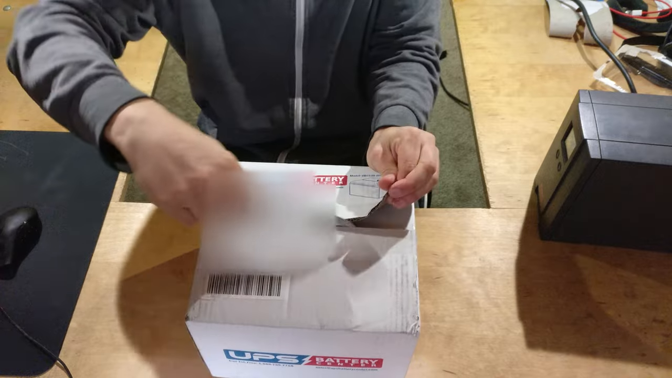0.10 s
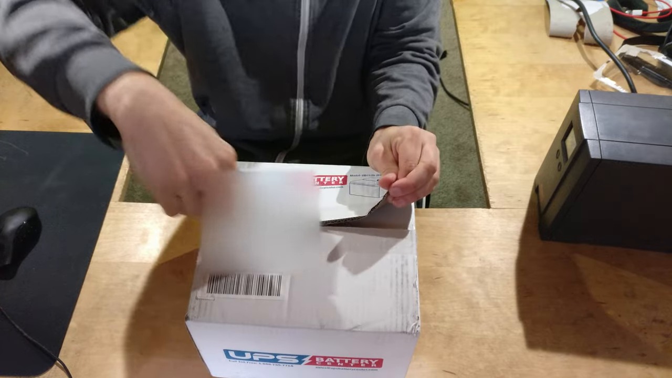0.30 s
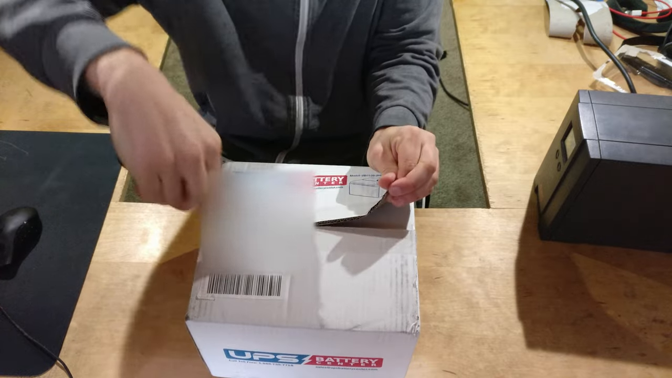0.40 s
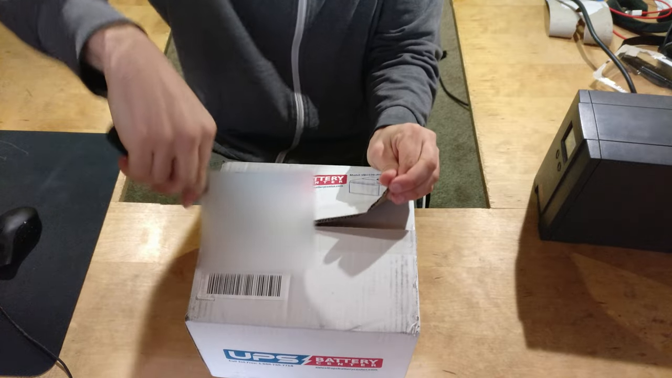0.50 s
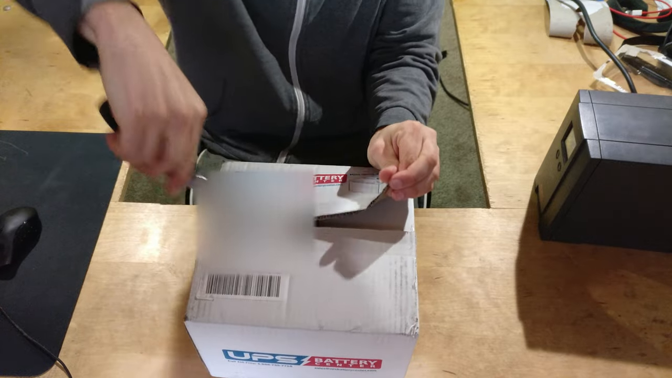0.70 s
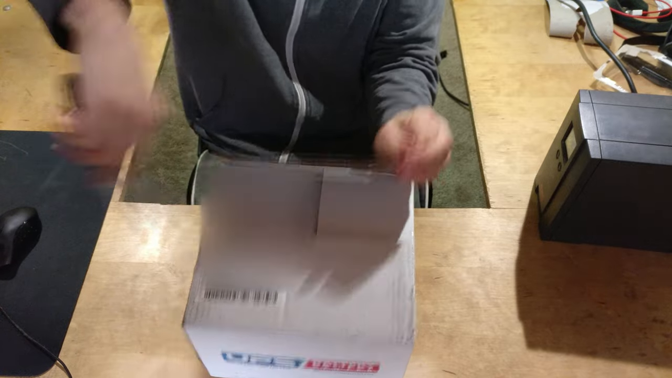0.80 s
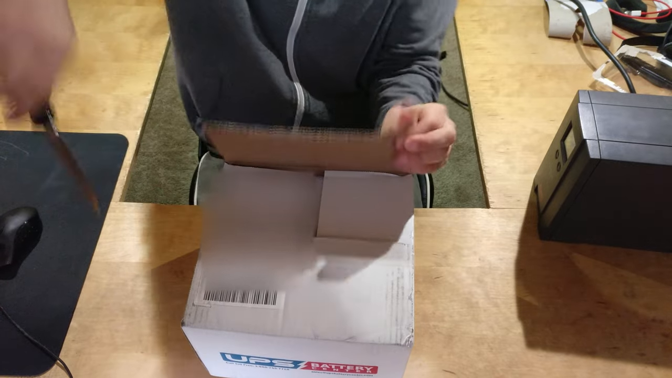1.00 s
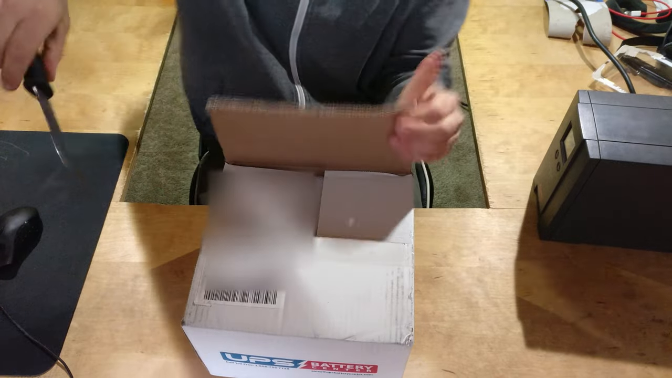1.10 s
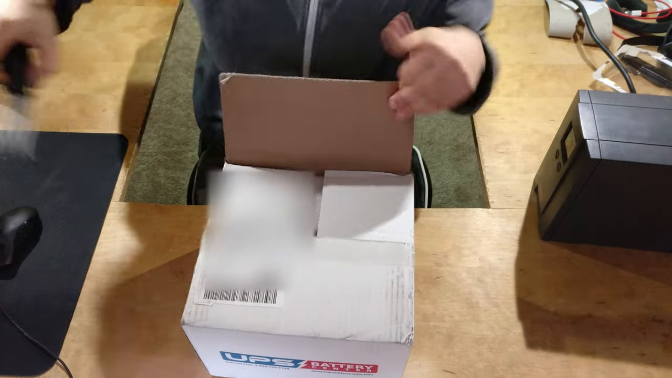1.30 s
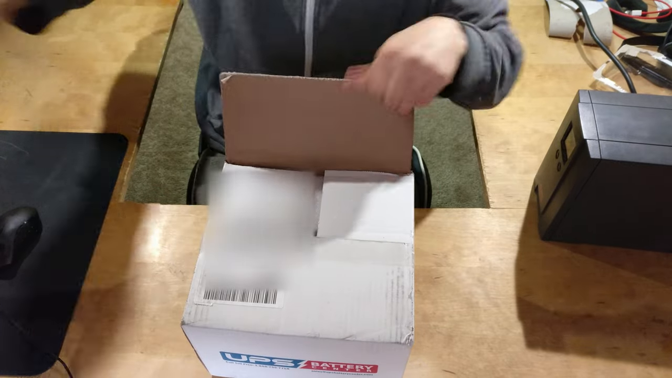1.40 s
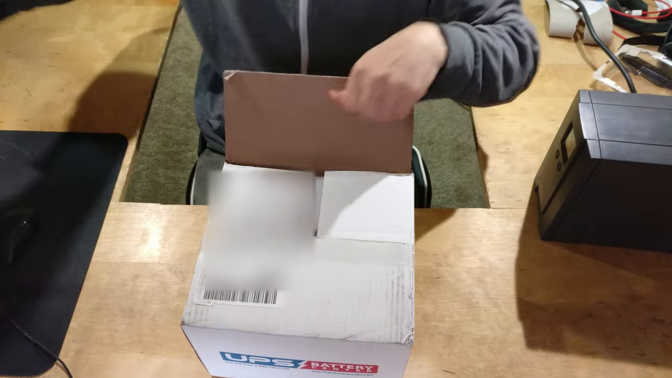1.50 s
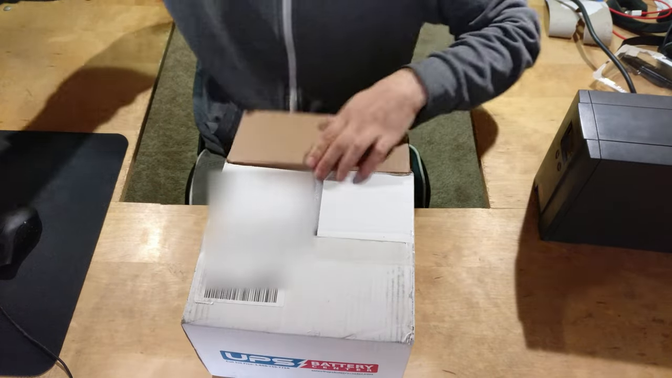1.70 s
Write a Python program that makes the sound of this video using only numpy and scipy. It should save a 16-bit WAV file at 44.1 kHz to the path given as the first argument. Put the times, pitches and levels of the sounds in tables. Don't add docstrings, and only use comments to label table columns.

```python
import sys
import numpy as np
from scipy import signal
from scipy.fft import rfft, irfft, next_fast_len
from scipy.io import wavfile
from scipy.ndimage import uniform_filter1d

SR = 44100
rng = np.random.default_rng(int(sys.argv[2]) if len(sys.argv) > 2 else 0)


def gain_from_decibels(decibels):
    exponent = np.asarray(decibels, float) / 20
    return 10 ** exponent


def dump_mix(stems):
    frames = np.atleast_2d(stems).T
    limited = np.clip(frames, -1, 1)
    pcm = np.round(limited * 32767).astype(np.int16)
    wavfile.write(sys.argv[1], SR, pcm)


N = 79380


def colour(x, points, share=1):
    size = next_fast_len(N + 4096)
    hz = np.arange(size // 2 + 1) * SR / size
    point_hz, point_db = np.array(points, float).T
    response_db = np.interp(np.log(hz + 1), np.log(point_hz), point_db)
    return irfft(rfft(x, size) * gain_from_decibels(share * response_db), size)[..., :N]


def filtered(x, order, hz, kind):
    return signal.lfilter(*signal.butter(order, hz, kind, fs=SR), x)


def unit(x):
    return x / np.sqrt(np.mean(x ** 2))


def walk(rate_hz):
    hold = int(SR / rate_hz)
    steps = rng.standard_normal(N + 1)[:N // hold + 1]
    return unit(uniform_filter1d(np.repeat(steps, hold), hold)[:N])


def ring(x, hz, t60):
    pole = np.exp(-np.log(1000) / (t60 * SR))
    turn = 2 * np.pi * hz / SR
    gain = np.sqrt(1 - pole * pole) * np.sin(turn)
    return signal.lfilter([gain], [1, -2 * pole * np.cos(turn), pole * pole], x)


def clicks(rate, spread_db):
    happens, sign, size = rng.random((3, N))
    return unit((happens < rate / SR) * np.sign(sign - .5) * gain_from_decibels(-spread_db * np.log(1 - size)))


def ports(three):
    alike = 0.25
    return np.sqrt(alike) * three[0] + np.sqrt(1 - alike) * three[1:]


# length in seconds, click level in dB,
# change over the stroke in dB, push into the box in dB
STROKES = [(0.015, -70.5, -6, -57.5), (.05, -82, -15, -88), (0.034, -52, -16, -29.5), (0.11, -71, 7, -56.5),
           (0.05, -55, 0, -44.5), (0.02, -57.5, 2.5, -47), (0.04, -50, -3, -32.5), (0.027, -44.5, 1, -32),
           (0.014, -32, -6, -28.5), (0.04, -39, 2.5, -33), (0.045, -48.5, 2.5, -40.5),
           (0.0063, -46, -3.5, -36), (0.033, -58.5, 2.5, -44.5), (.02, -34.5, -6.5, -29),
           (0.12, -29, -11, -21.5), (0.027, -28.5, 4, -18), (0.052, -34, -14, -17.5), (0.031, -66, 2, -64),
           (0.028, -50, -10, -39), (0.05, -66, -6, -69.5), (0.228, -70.5, 3.5, -62.5),
           (0.048, -61.5, -2, -81.5), (0.095, -60.5, 10, -48.5), (0.038, -41, -0.5, -56),
           (0.13, -53, -7, -52), (0.0424, -45, -11.5, -38), (0.074, -86, -9, -76)]
STARTS_S = [.052, .16, .2575, .31, .384, .441, .464, .518, .548, .572, .655, .687, .745, .7715, .792, .856,
            .89]
LATE_STARTS_S = [
    1.07,
    1.096,
    1.23,
    1.29,
    1.34,
    1.521,
    1.614,
    1.655,
    1.727,
    1.77,
]


def effort(column):
    t, power = np.arange(N) / SR, 0
    for start, row in zip(STARTS_S + LATE_STARTS_S, STROKES):
        length_s, click_db, change_db = row[:3]
        age = t - start
        attack_s = 0.0018 + .0005 * max(-50 - click_db, 0)
        db = row[column] + change_db * np.clip(age / length_s, 0, 1)
        db = db - 894.5 * np.maximum(age - length_s, 0)
        power = power + (gain_from_decibels(db) * np.clip(age / attack_s, 0, 1)) ** 2
    return np.sqrt(power)


# frequency in Hz, level in dB per Hz
FIBRES = [(470, -42), (800, -16), (1170, -15.5), (1520, -11), (2730, -12), (5940, -16.5), (7260, -22),
          (9450, -23), (16000, -34)]


def tear():
    raw = np.array([clicks(5000, 2) for _ in range(3)])
    scraps = 0
    for hz in np.geomspace(1100, 14500, num=28):
        scraps = scraps + ring(raw * gain_from_decibels(6 * walk(70)), hz, .014) * np.sqrt(hz)
    fibres = unit(colour(raw + gain_from_decibels(-5) * unit(scraps), FIBRES))
    sheen = filtered(fibres[::-1], 2, 10500, "high")
    level = effort(column=1)
    bright = gain_from_decibels(-11) * ports(sheen) * level ** 0.73
    return (ports(fibres) * level + bright) * gain_from_decibels(0.86 * walk(300))


# frequency in Hz, level in dB, time to die by 60 dB in seconds
BOX = [(50, -28.5, 0.094), (80, -25, 0.3), (108, 1, 0.27), (186, -5.5, 0.1), (246, -4, 0.13),
       (311, -7.5, 0.069), (384.6, -12, 0.071), (501, -6.5, 0.035), (567, -8.5, 0.074), (649.2, -2, 0.059),
       (760, -14.5, .1), (1000, -14, .07), (1446, -8, 0.031), (1926, -1.5, 0.017)]


def shake(jolts):
    total = 0
    for hz, db, t60 in BOX:
        total = total + gain_from_decibels(db) * (108 / hz) ** 0.11 * ring(jolts, hz, 0.3 * t60)
    return total


def rub():
    jolts = np.array([clicks(1500, 2.6) for _ in range(2)])
    shaken = shake(jolts * effort(column=3)) / np.std(shake(jolts))
    mid, side = filtered(shaken, 1, 1040, "low")
    side = gain_from_decibels(-8.5) * filtered(side, 2, 450, "high")
    return np.array([mid + side, mid - side])


def fade(age, t60):
    return gain_from_decibels(-60 * (age / t60) ** 1.5)


def struck(age, free_hz, free_t60, chance):
    hz, db, t60 = np.array(BOX, float).T[:, :, None]
    level_chance, pitch_chance, sign_chance = chance
    octaves_away = np.abs(np.log2(hz / free_hz))
    gain = np.sign(sign_chance) * gain_from_decibels(-10 + db + 4.5 * level_chance - 6 * octaves_away / 1.6)
    waves = np.sin(2 * np.pi * hz * (1 + 0.033 * pitch_chance) * age)
    others = np.sum(gain * waves * fade(age, np.minimum(t60, 2.2 * free_t60)), axis=0)
    panel = -np.sin(2 * np.pi * free_hz * age) * fade(age, min(free_t60, 42 / free_hz))
    contact_turns = 0.24
    push = np.sin(np.pi * np.clip(np.arange(800) / SR * free_hz / contact_turns, 0, 1))
    return signal.fftconvolve(others + panel, push / push.sum())[:len(age)]


# start in
# seconds, peak in dB, pitch of the free panel in Hz, its time to die by 60 dB in seconds, crack in dB relative
KNOCKS = [(.055, -46.5, 186, 0.085, -48), (0.2122, -12.5, 207, 0.049, -26.5),
          (0.259, -26.5, 289, 0.027, -18), (0.272, -15.5, 113.4, 0.12, -43), (.406, -32.5, 109, 0.17, -49),
          (0.464, -29, 261, 0.08, -5.5), (.479, -23.5, 173, 0.049, -48), (0.4914, -15, 186.4, 0.05, -36),
          (0.521, -18, 232, 0.039, -49), (0.548, -22.5, 223, 0.071, 9), (0.582, -21, 108, 0.14, -53),
          (.602, -21, 106, 0.12, -45), (0.708, -31, 97, 0.2, -46), (0.7718, -29, 226, 0.1, 6),
          (.793, -21.5, 633, 0.15, 9.5), (0.798, -29.5, 223.7, 0.24, -10), (0.8659, -16, 183.6, .12, 13),
          (.872, -17.5, 50, 0.29, -51.5), (0.883, -24, 108, 0.12, -29), (1.096, -39.5, 90.1, 0.09, 4),
          (1.534, -29, 95.7, 0.071, -40), (1.564, -25.5, 317, 0.045, 2.5), (1.7477, -21, 171, 0.015, -40),
          (1.7631, -28.5, 108, 0.033, -38),
          (.2125, -27, 630, 0.039, -40), (.2595, -28.5, 632.4, .06, -16), (.867, -20, 1040, 0.033, -30),
        (.87, -18, 660, 0.076, -29.5), (0.66, -38, 1520, 0.043, -30), (.903, -17, 106, 0.2, -41),
        (1.736, -27, 120, 0.028, -22), (1.266, -51, 95, 0.096, -27.5), (1.098, -47, 820, 0.049, -8),
        (1.782, -33.5, 100, .09, -40), (.975, -27, 105, 0.11, -39.5), (1.1, -36.5, 48, 0.056, -40),
        (.59, -30, 1520, 0.02, -20), (.812, -24.5, 620, 0.047, -19.5), (1.9, -52, 520, .05, -32),
        (1.616, -47, 1400, .04, -21), (.06, -54, 85, .1, -40), (.44, -30.5, 200, .05, -3),
        (0.32, -30.5, 215, .04, -30), (.7995, -22.5, 280, 0.014, 0.5), (.861, -26, 600, 0.023, 4),
        (.8755, -22, 1950, .02, 4.5), (.881, -27.5, 610, .02, 2.5), (.898, -23, 310, 0.016, 0.5),
        (.532, -24, 100, .1, -30), (1.17, -45.5, 70, .08, -40), (1.5, -48.5, 76, .06, -41),
        (0.62, -54, 75, .07, -26.5), (.945, -32.5, 200, 0.066, -26.5), (0.55, -50.5, 100, .05, -40),
        (0.59, -34.5, 700, .02, -4), (.6582, -36, 360, 0.047, 2), (0.43, -36, 250, 0.065, -1.5),
        (.575, -26.5, 280, .04, -4), (1.585, -33, 90, .07, -30), (.69, -33, 260, .08, -30)]
# frequency in Hz, level in dB per Hz
CRACK = [(470, -31.5), (800, 6), (1500, -15), (1950, -1), (3830, -9), (8550, -18.5), (16000, -34.5)]


def knocks():
    body, crack, thud = np.zeros((3, N + SR))
    events = KNOCKS
    chances = rng.standard_normal((len(events), 3, len(BOX), 1))
    grit = ports(unit(colour(rng.standard_normal((3, N)), CRACK)))
    age = np.arange(SR // 2) / SR
    for (start, peak_db, free_hz, free_t60, crack_db), chance in zip(events, chances):
        at = int(start * SR)
        late = np.maximum(age - (start * SR - at) / SR, 0)
        span = slice(at, at + len(age))
        body[span] += struck(late, free_hz, free_t60, chance) * gain_from_decibels(peak_db)
        crack[span] += gain_from_decibels(peak_db + crack_db - 8.5) * np.exp(-late / .0022)
        thud_db = peak_db - 30.5 + 0.64 * (crack_db + 25.5)
        thud[span] += gain_from_decibels(thud_db) * np.exp(-late / 0.0068)
    dull = unit(ring(rng.standard_normal((2, N)), 1720, 0.003))
    flutter = gain_from_decibels(0.71 * walk(39.38))
    return body[:N] * flutter + crack[:N] * grit + thud[:N] * dull


def room(dry):
    age = np.arange(SR // 2) / SR
    t60_s, level_db = 0.27, -13
    tail = rng.standard_normal((2, len(age))) * gain_from_decibels(-60 * age / t60_s) * (age > .004)
    tail = gain_from_decibels(level_db) * unit(tail) / np.sqrt(len(age))
    sent = filtered(dry.mean(axis=0), 2, [164, 7000], "band")
    return signal.fftconvolve(sent[None], tail, axes=1)[:, :N]


def hiss():
    return filtered(rng.standard_normal((2, N)), 2, 7500, "high") * gain_from_decibels(-78.5 + 1.6 * walk(13))


# frequency in Hz, level in dB per Hz
FLOOR = [(18, -32), (40, -6), (86, -8), (165, -12.5), (240, -21.5), (295, -29), (394, -29.5),
         (13300, -44.5), (16000, -64.5)]


def hum():
    return unit(colour(ports(rng.standard_normal((3, N))), FLOOR)) * gain_from_decibels(-63.5 + .8 * walk(8.7))


# frequency in Hz, left minus right in dB
PORTS = [(60, 5.5), (110, 0.5), (200, 1), (380, -1.5), (700, 2), (1290, 3.5), (2380, 1.5), (4400, 1.5),
         (8120, -16.5), (15000, -12)]


def scene():
    dry = knocks() + rub() + tear()
    near = dry + room(dry) + hiss()
    return np.array([colour(near[0], PORTS, 0.17), colour(near[1], PORTS, -0.57)]) + hum()


def top_cut(x):
    return signal.sosfilt(signal.butter(12, 17160, fs=SR, output="sos"), x)


def record(dry):
    x = filtered(dry, 2, 65, "high")
    x = signal.sosfilt(signal.ellip(8, .3, 60, 15900, fs=SR, output="sos"), x)
    gate_db, depth_db, gate_s, ceiling = -47.5, -5.5, 0.06, 2.2
    power = uniform_filter1d(np.mean(x ** 2, axis=0), int(gate_s * SR))
    shut = 1 / (1 + power / gain_from_decibels(gate_db) ** 2)
    mix = ceiling * np.tanh(x / ceiling) * gain_from_decibels(depth_db * shut)
    return top_cut(mix)


dry = scene()
out = record(dry)
dump_mix(out)
```